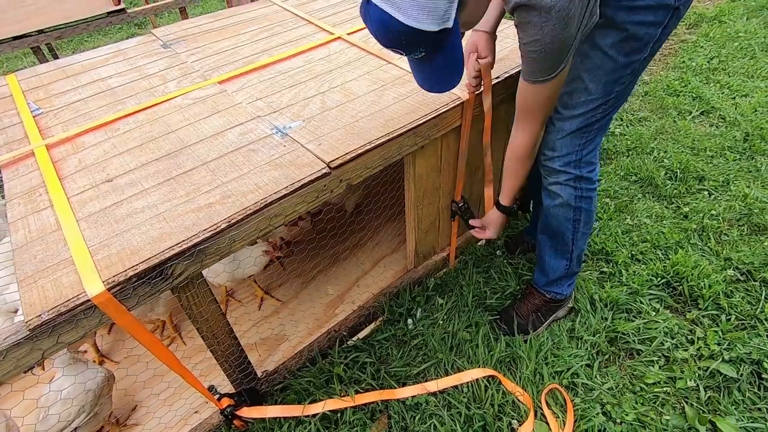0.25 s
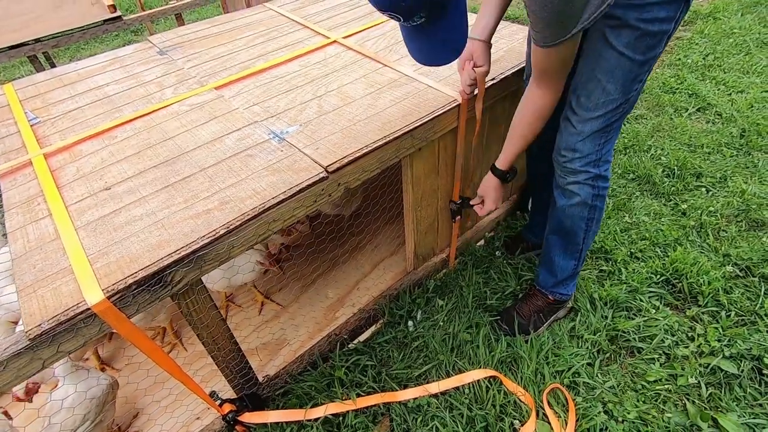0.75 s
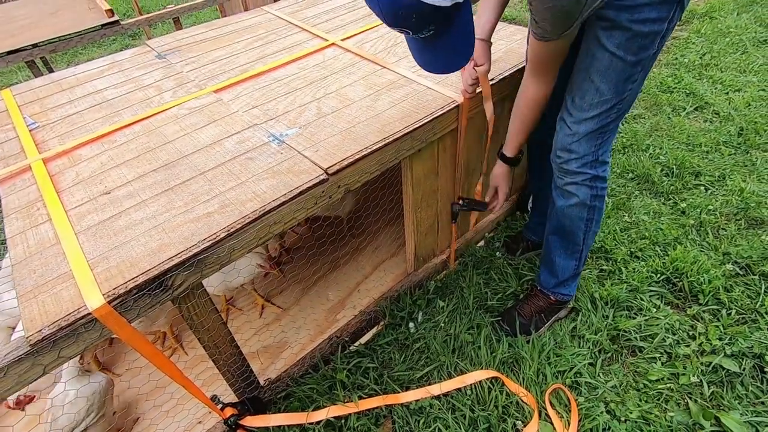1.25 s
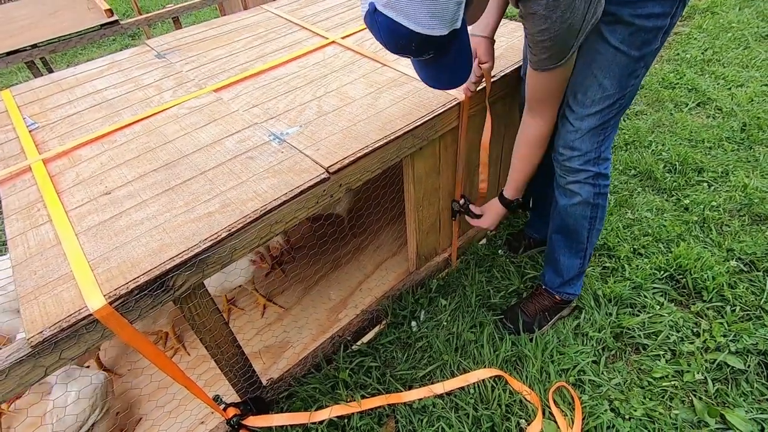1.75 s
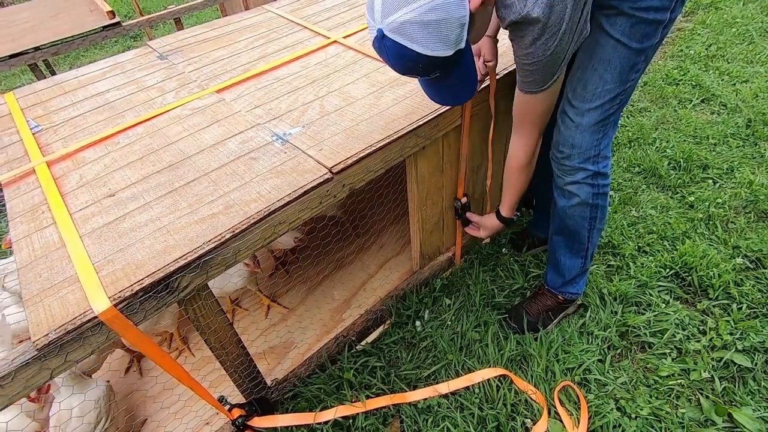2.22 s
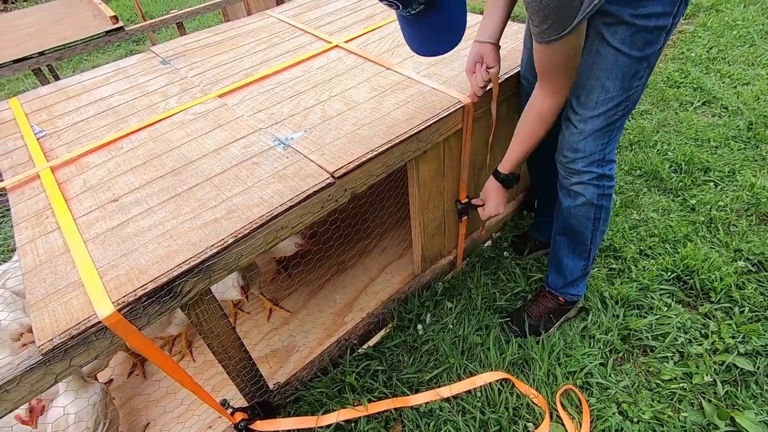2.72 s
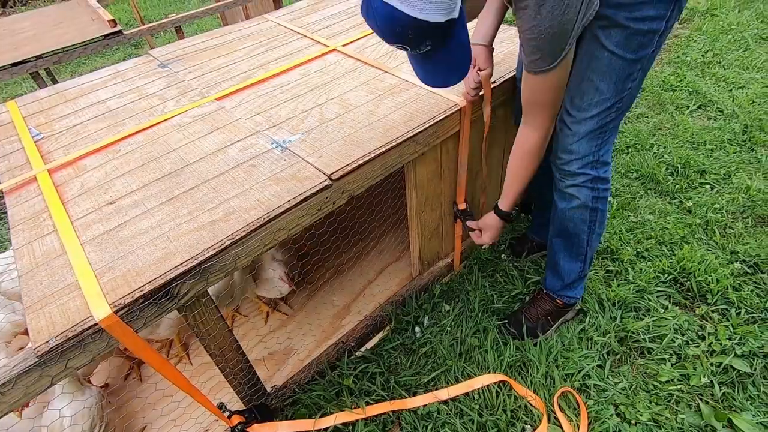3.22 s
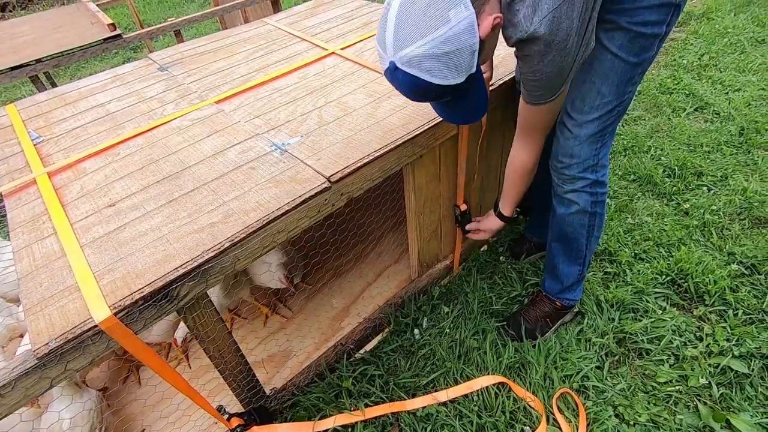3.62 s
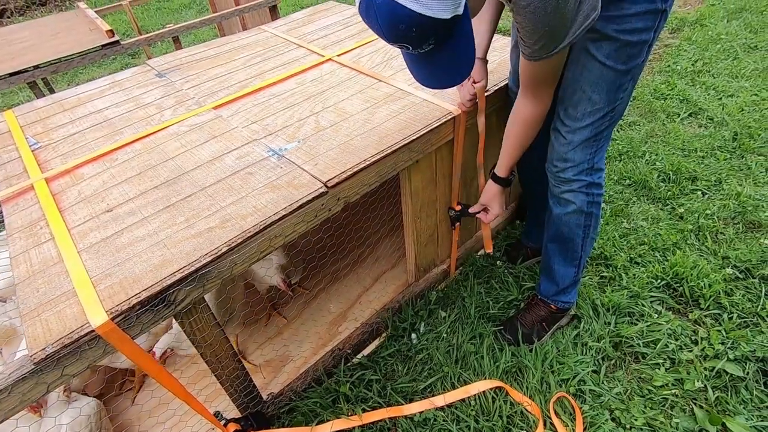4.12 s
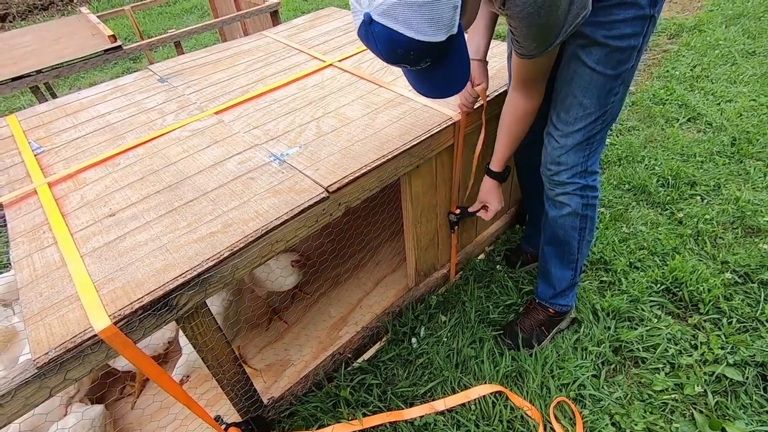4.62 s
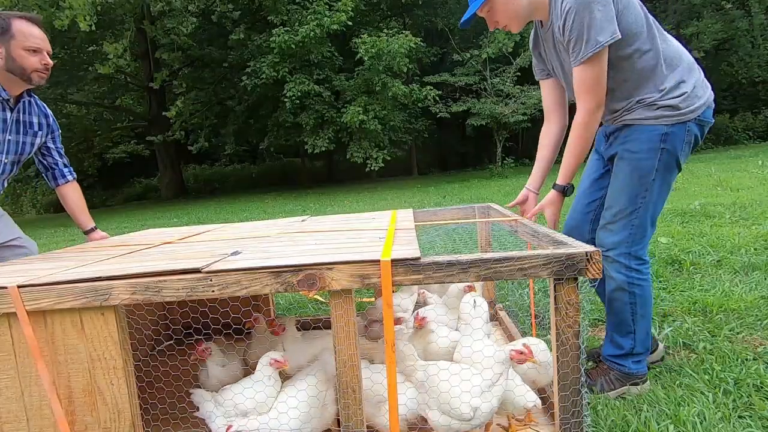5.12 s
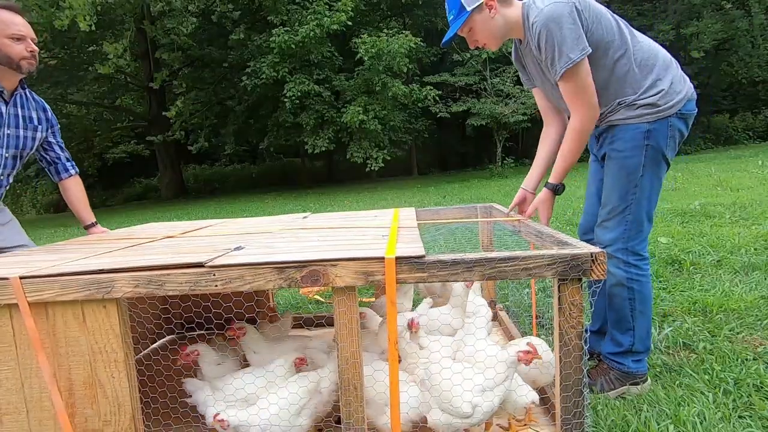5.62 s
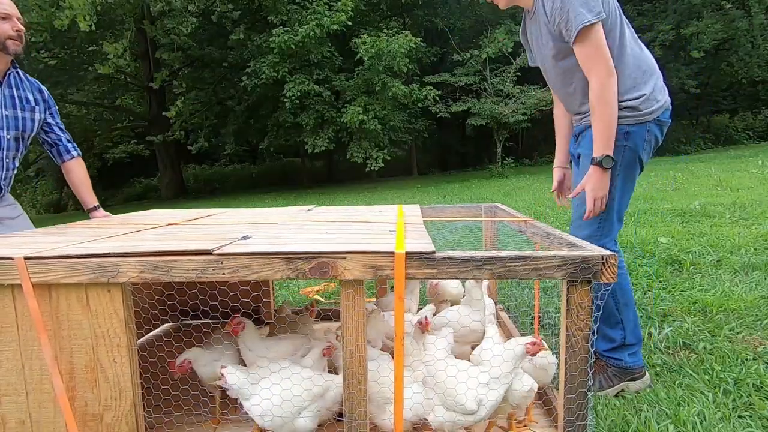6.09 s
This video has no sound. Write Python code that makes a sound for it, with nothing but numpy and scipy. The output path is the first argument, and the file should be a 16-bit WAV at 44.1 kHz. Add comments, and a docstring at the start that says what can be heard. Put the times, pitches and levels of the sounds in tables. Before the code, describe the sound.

A close outdoor take beside a wooden coop full of chickens, with feather rustle, shuffling feet and a barely audible low breeze. From 0 to 1.1 s a steel strap ratchet clicks and snaps in a quickening run, ending in a hard board knock and low frame thuds around 1 s. Chickens give falling chirps and small croaks from about 1.3 s as webbing swishes near 1.7 s. Snaps return at 1.8 to 2.2 s with heavy wooden thumps, then a very sharp clack at 2.7 s and more until 3.1 s. Lighter clicks follow from 3.3 to 3.7 s, and a last run with thuds at 3.9 to 4.2 s. Afterwards there is no cranking: thin cries and chirps, weak dull knocks from 4.8 s, then hoarse overlapping flock chatter around 5.5 to 5.9 s and again just after 6 s, with trailing cries.

```python
"""A light breeze sways the air, mostly below hearing, while birds shuffle and rustle in a wooden coop.
A ratchet strap is cranked tight on it: its handle clacks and its steel pawl snaps over the teeth.
Soon the boards knock and the frame thuds, and young chickens chirp in falling notes and cry.
Near the end the boards knock a few more times and the flock breaks into hoarse chatter.
Blows are bursts of noise shaped by steel or wood, thuds are ringing tones, and calls are gliding tones."""
import sys
import numpy as np
from scipy import signal
from scipy.fft import rfft, irfft, next_fast_len
from scipy.io import wavfile
from scipy.ndimage import map_coordinates

SR = 44100
rng = np.random.default_rng(int(sys.argv[2]) if len(sys.argv) > 2 else 0)


def dump_mix(stems):
    """Bounce the given channels to the path in sys.argv[1] as a 16-bit WAV at rate SR."""
    frames = np.atleast_2d(stems).T  # one column per channel
    limited = np.clip(frames, -1, 1)  # hard clip at full scale
    pcm = np.round(limited * 32767).astype(np.int16)
    wavfile.write(sys.argv[1], SR, pcm)


N = 280035  # samples in the scene

# slow sway of the air: time_s, level_db
BREEZE_LEVELS = [(4.4, -15.5), (5, -22), (6.35, -32)]

# colour of the birds' shuffling: frequency_hz, level_db (per Hz)
SHUFFLE_COLOUR = [(60,2), (342,-10), (600,-23.5), (4000,-29), (8800,-43)]
# colour of feathers and webbing: frequency_hz, level_db (per Hz)
RUSTLE_COLOUR = [(1200,5), (2800,-8), (6500,-6), (16000,-22)]
RUSTLE_DB = -58  # level of the steady feather rustle
# webbing slides through the buckle: time_s, level_db
STRAP_PULLS = [(1.67, -44), (2.96, -46.5), (4.1, -49.5)]
PULL_S = 0.052  # half the length of a pull

# the handle clacks against its stops: start_s, level_db, brightness_db (per octave)
HANDLE_CLACKS = [(0.051, -29, -2), (0.125, -28, -2), (0.671, -24.5, -1), (1.092, -30, -3.5), (1.18, -35, 5),
                 (2.147, -22, -4.5), (2.427, -37, -1), (2.454, -33, -1.5), (2.65, -25.5, -0.5),
                 (2.676, -9.5, 0.5), (2.866, -21.5, -6), (2.872, -17, -0.5), (2.997, -29.5, -2),
                 (3.098, -24, 0), (3.681, -31, -1), (4.076, -22, -3.5), (4.156, -16.5, -0.8)]
CLACK_S = 0.0019  # length of a clack
# the pawl snaps over a tooth: start_s, level_db, brightness_db (per octave)
PAWL_SNAPS = [(0.257, -19, -1.5), (0.364, -21, 1.5), (0.534, -21.5, -0.5), (0.744, -17.5, -0.5),
              (0.809, -16.5, 0), (0.907, -14.5, 0), (1.056, -17.5, -7), (1.068, -20.5, -2),
              (1.846, -21, -1), (1.98, -17.5, 0.3), (2.783, -13, 1.5), (2.912, -14, -0.6),
              (3.318, -18, 1.5), (3.416, -20, -1.2), (3.53, -21, -2), (3.585, -20.5, -2.8),
              (3.969, -15.5, -1.5), (4.139, -21, -1.5)]
SNAP_S = 0.0068  # length of a snap
SLIDE_S, SLIDE_DB = 0.012, -19.5  # the slide before a snap: average length, level relative to the snap
REBOUND_S, REBOUND_DB = 0.006, -5.5  # the pawl strikes again: average delay, greatest relative level
LOOSE_S, LOOSE_DB = 0.071, -19  # faint ticks after a contact: longest delay, greatest relative level
# colour of the ratchet's steel: frequency_hz, level_db (per Hz)
STEEL_COLOUR = [(300, -11), (1000, -8), (1900, -8.5), (3200, -1), (7400, 2), (10000, -2.5), (15500, -13.5)]
# resonances of the steel, before chance: pitch_hz, width_hz, level_db
STEEL_RESONANCES = [(4750, 250, -2), (7330, 350, -2.5), (12070, 250, -2)]
STEEL_SPREAD_DB, RAGGED_DB = 3.5, 4  # colour change between contacts, level flutter within one

# knocks on the boards: start_s, level_db (before a 6 dB lift), hardness_hz (cut-off)
BOARD_KNOCKS = [(0.507, -42.5, 825), (0.766, -39.5, 960), (.921, -35.5, 915), (1.054, -9.5, 1300),
                (1.062, -18, 1020), (1.899, -30, 1030), (1.965, -13, 620), (2.058, -24.5, 990),
                (2.07, -12, 476), (2.258, -22, 860), (2.652, -35, 950), (2.997, -34, 490),
                (3.217, -33, 1040), (3.3, -34.5, 545), (3.361, -36, 444), (3.613, -24.5, 640),
                (4.056, -39.5, 1400), (4.842, -39, 470), (5.064, -41.5, 700), (5.408, -27.5, 905),
                (5.458, -31, 640), (5.564, -29.5, 605), (6.102, -26, 1010)]
CONTACT_S = 0.0027  # contact time of a blow listed at 0 dB
CONTACT_DOUBLES_DB = 11.5  # contact time doubles for each such drop in level
# colour of the coop's boards: frequency_hz, level_db (per Hz)
BOARD_COLOUR = [(50, -4.5), (200, 4), (350, 1), (680, -4.5), (2000, -8.5), (12000, -4)]
# resonances of the roof panel: pitch_hz
PANEL_PITCHES = [345, 484, 678, 1112]
PANEL_WIDTH_HZ, PANEL_DB = 18, -11  # width and height of each panel resonance

# the whole frame takes the strap's pull: start_s, level_db
FRAME_THUDS = [(0.761, -21), (0.923, -22), (0.991, -11.5), (1.059, -18.5), (2.07, -16.5), (2.658, -17),
               (2.795, -18), (2.923, -20), (3.947, -18), (4.063, -16.5), (4.198, -15.5)]
# ringing tones of the frame, before chance: pitch_hz, level_db, t60_s (time to fade by 60 dB)
FRAME_TONES = [(107, 5.5, 0.23), (154.6, 1, 0.23), (208.9, -4, 0.35)]
# the boards rub as the frame flexes: length, cut-off, level relative to the thud
CREAK_S, CREAK_HZ, CREAK_DB = 0.013, 627, -11

# unbroken, gliding cries: start_s, end_s, opening_pitch_hz, closing_pitch_hz, level_db
GLIDING_CRIES = [(0.971, 1.061, 3150, 2410, -42.5), (1.176, 1.375, 2406, 2130, -58),
                 (1.415, 1.446, 967, 746, -39.5), (1.447, 1.472, 1425, 2600, -45),
                 (1.468, 1.528, 2470, 2140, -48), (2.126, 2.257, 2850, 2370, -42),
                 (2.47, 2.561, 3690, 2910, -50), (3.378, 3.526, 3440, 2750, -47.5),
                 (3.429, 3.547, 2650, 2370, -44.5), (4.095, 4.166, 869, 805, -35),
                 (4.285, 4.345, 3500, 2290, -55), (4.361, 4.428, 1352, 860, -42.5),
                 (4.478, 4.55, 4420, 4000, -54.5), (4.528, 4.65, 4380, 2380, -51.5),
                 (5.037, 5.212, 3710, 2980, -51), (5.695, 5.83, 1790, 1594, -43),
                 (5.942, 6.048, 4060, 3300, -59), (6.152, 6.353, 3680, 2370, -50.5),
                 (6.164, 6.349, 2350, 1670, -49)]
# nearest chickens' chirps: start_s, end_s, opening_pitch_hz, whistle_db, croak_db
CHIRPS = [(1.269, 1.39, 1300, -45.5, -36.5), (1.827, 1.941, 3050, -37, -42), (2.086, 2.261, 3200, -44, -36),
          (2.478, 2.562, 1660, -38, -40), (2.556, 2.74, 1220, -44, -34.5),
          (2.932, 3.063, 2400, -41.5, -48.5), (3.104, 3.216, 3350, -46.5, -37.5),
          (3.659, 3.806, 1647, -47.5, -33.5), (3.758, 3.841, 2100, -40.5, -36.5),
          (3.829, 3.913, 2400, -48, -41), (4.374, 4.486, 3800, -46, -42.5), (4.572, 4.673, 2600, -40, -43),
          (5.03, 5.141, 3300, -46.5, -41), (5.228, 5.297, 3600, -41.5, -43),
          (5.465, 5.554, 2985, -42.5, -41.5), (5.561, 5.679, 3300, -47.5, -36),
          (5.701, 5.783, 2700, -47, -33.5), (5.779, 5.895, 3400, -55, -40),
          (6.025, 6.127, 2750, -34.5, -33.5), (6.061, 6.184, 3450, -43, -36.5)]
SAG_PER_S, BREAK_S = 0.98, 0.032  # slow sinking rate of a whistle, time over which it breaks
CROAK_HZ, CROAK_S = 792, 0.046  # pitch it plunges to, length of the closing croak
# bursts of flock chatter: first_call_s, last_call_s, calls (count)
CHATTER_BURSTS = [(5.47, 5.75, 15), (6.02, 6.13, 7)]
# flock's calls: middle pitch, highest pitch over lowest, greatest share of pitch lost
FLOCK_HZ, FLOCK_RANGE, CHATTER_FALL = 2200, 3, 0.4
CHATTER_CALL_S, CHATTER_RASP, CHATTER_DB = 0.13, 0.5, -52  # average length, hoarseness, level
WHISTLE_RASP, CROAK_RASP = 0.26, 1  # hoarseness of a whistle, what the break adds
WAVER, RASP_RATE = 0.00706, 550  # share by which pitch wavers, hoarse flutters a second
# a voice: average distance and greatest level of side strands, overtone level, slow level flutter
STRAND_OCTAVES, STRAND_DB, OVERTONE_DB, FLUTTER_DB = 0.33, -10.5, -19, 3

TOP_HZ = 15900  # highest frequency the recorder keeps


def amp(db):
    """Turn decibels into a gain."""
    return 10 ** (np.asarray(db) / 20)


def unit(x):
    """Scale a sound to an average (rms) size of 1."""
    return x / np.sqrt(np.mean(x ** 2) + 1e-20)


def along(points, hz):
    """Read a (frequency, value) curve on a log frequency axis."""
    f, v = np.transpose(points)
    return np.interp(np.log(hz + 1), np.log(f + 1), v)


def curves(rows):
    """Draw one value per sample for each column after the time."""
    s, *cols = np.transpose(rows)
    return [np.interp(np.arange(N) / SR, s, c) for c in cols]


def wobble(rate, n):
    """Draw a smooth random curve of n samples through `rate` random points a second."""
    points = rng.standard_normal(int(n * rate / SR) + 4)
    return map_coordinates(points, [np.arange(n) * rate / SR])


def filtered(x, gain):
    """Filter x by gain(hz), with no sound ahead of its cause (a minimum-phase filter)."""
    m = 2 * next_fast_len(len(x))
    cepstrum = irfft(np.log(np.maximum(gain(np.fft.rfftfreq(m, 1 / SR)), 1e-6)), m)
    # folding the second half onto the first keeps the response after time zero
    cepstrum[1:m // 2] *= 2
    cepstrum[m // 2 + 1:] = 0
    return irfft(rfft(x, m) * np.exp(rfft(cepstrum)), m)[:len(x)]


def noise(spectrum):
    """Make coloured noise of rms 1."""
    return unit(filtered(rng.standard_normal(N), lambda hz: amp(along(spectrum, hz))))


def add(track, s, sound):
    """Mix a sound into the track at time s."""
    part = track[max(round(s * SR), 0):][:len(sound)]
    part += sound[:len(part)]


def at_level(x, db, length):
    """Give a blow the energy of a level db held for its length."""
    return x * amp(db) * np.sqrt(length * SR / np.sum(x ** 2))


def contact(t, length, grit, ring_db, t60):
    """A gritty scrape builds up and lets go; longer ones leave more chatter in loose parts."""
    grains = wobble(2500, len(t))
    build_up = 1 - np.exp(-t / (0.22 * length))
    let_go = np.exp(-(t / length) ** 3)
    scrape = build_up * let_go * unit(np.exp(grit * grains))
    chatter = np.sqrt(length / t60) * amp(ring_db - 60 * t / t60)
    return (scrape + chatter) * rng.standard_normal(len(t))


def coop(x, wet_db, t60):
    """Dense echoes between the plywood walls: a dulled noise tail that fades by 60 dB in t60 seconds."""
    t = np.arange(SR // 3) / SR
    tail = rng.standard_normal(len(t)) * amp(-60 * t / t60)
    tail = filtered(tail / np.linalg.norm(tail), lambda hz: 1 / np.hypot(1, hz / 5000))
    return x + amp(wet_db) * signal.fftconvolve(x, tail)[:N]


def breeze():
    """Slow swings of air pressure, with a faint rumble above them, made from very low noise."""
    sway_db, = curves(BREEZE_LEVELS)
    return amp(sway_db) * noise([(5, -3.5), (38, -30), (52, -40.0), (1000, -115)])


def stirring():
    """Birds shuffle and tap on the floor; feathers rustle, and the webbing swishes at each pull."""
    clock = np.arange(N) / SR
    pulls = sum(amp(db) * np.exp(-((clock - s) / PULL_S) ** 2) for s, db in STRAP_PULLS)
    rubbing = amp(RUSTLE_DB) + pulls
    shuffle = amp(-41.5) * unit(noise(SHUFFLE_COLOUR) * amp(5.5 * wobble(35, N)))
    flutter_db = 2 * wobble(50, N) + 3.5 * wobble(900, N)
    rustle = rubbing * unit(noise(RUSTLE_COLOUR) * amp(flutter_db))
    # 70 short taps at random times, dulled by the boards
    steps, t = np.zeros(N), np.arange(SR // 8) / SR
    for when, size in rng.random(size=(70, 2)):
        tap = amp(10 * size - 60 * t / 0.047) * rng.standard_normal(len(t))
        add(steps, when * N / SR, tap)
    steps = filtered(steps, lambda hz: amp(along(BOARD_COLOUR, hz)) / (1 + (hz / 700) ** 2))
    return shuffle + rustle + amp(-49) * unit(steps)


def steel(t, length, bright_db):
    """One ragged steel contact, its colour and resonances varied by chance."""
    sizes = STEEL_SPREAD_DB * rng.standard_normal(len(STEEL_RESONANCES))
    bumps = STEEL_SPREAD_DB * rng.standard_normal(20)
    bump_hz = np.linspace(0, SR / 2, len(bumps))

    def ring(hz):
        """Add a peak at each resonance of the steel."""
        return 1 + sum(amp(level + a) / (1 + (2 * (hz - f) / width) ** 2)
                       for a, (f, width, level) in zip(sizes, STEEL_RESONANCES))

    def gain(hz):
        """Join the steel's colour, its chance bumps, the brightness above 2500 Hz and the ringing."""
        tilt_db = bright_db * np.log2(np.maximum(hz / 2500, 1))
        colour_db = np.interp(hz, bump_hz, bumps) + tilt_db
        return amp(along(STEEL_COLOUR, hz) + colour_db) * ring(hz)

    push = contact(t, length, grit=0.87, ring_db=7, t60=0.051)
    return filtered(push * amp(RAGGED_DB * wobble(538, len(t))), gain)


def ratchet():
    """The pawl slides up a tooth, slaps home and rebounds; the handle clacks and loose parts tick."""
    out, t = np.zeros(N), np.arange(SR // 8) / SR
    chances = rng.random((len(PAWL_SNAPS), 3))
    for (s, db, bright_db), (slow, late, hard) in zip(PAWL_SNAPS, chances):
        slide_s = SLIDE_S * (0.5 + slow)
        slide = steel(t, slide_s, bright_db)
        add(out, s - slide_s, at_level(slide, db + SLIDE_DB, SNAP_S))
        snap = steel(t, SNAP_S, bright_db)
        add(out, s, at_level(snap, db, SNAP_S))
        rebound = steel(t, CLACK_S, bright_db)
        rebound_db = db + REBOUND_DB - 10 * hard
        add(out, s + REBOUND_S * (0.5 + late), at_level(rebound, rebound_db, CLACK_S))
    for s, db, bright_db in HANDLE_CLACKS:
        add(out, s, at_level(steel(t, CLACK_S, bright_db), db, CLACK_S))
    # two loose ticks follow every contact
    contacts = [*PAWL_SNAPS, *HANDLE_CLACKS] * 2
    for (s, db, bright_db), (lag, size) in zip(contacts, rng.random((len(contacts), 2))):
        tick = steel(t, CLACK_S / 2, bright_db)
        add(out, s + LOOSE_S * lag, at_level(tick, db + LOOSE_DB - 20 * size, CLACK_S))
    return out


def boards(push, hard_hz):
    """The coop answers a push: harder contacts reach higher, and the roof panel rings along."""
    def gain(hz):
        """Join the wood's colour, the panel's peaks and the low and high cuts set by hardness."""
        peaks = sum(1 / (1 + (2 * (hz - f) / PANEL_WIDTH_HZ) ** 2) for f in PANEL_PITCHES)
        panel = 1 + amp(PANEL_DB) * peaks
        low_cut = hz ** 2 / (hz ** 2 + (0.21 * hard_hz) ** 2)
        high_cut = 1 / np.sqrt(1 + (hz / hard_hz) ** 4.8)
        return amp(along(BOARD_COLOUR, hz)) * panel * low_cut * high_cut

    return filtered(push, gain)


def knocks():
    """A blow, then a rattle of damped boards: strong blows are brief, weak ones scuff."""
    out, t = np.zeros(N), np.arange(SR // 4) / SR
    for s, db, hard_hz in BOARD_KNOCKS:
        length = CONTACT_S * 2 ** (-db / CONTACT_DOUBLES_DB)
        push = contact(t, length, grit=0.9, ring_db=6.5, t60=0.094)
        push[0] += 0.0055 / length * np.linalg.norm(push)  # short contacts land as one clean impact
        add(out, s, at_level(boards(push, hard_hz), db + 6.0, length))
    return out


def thuds():
    """Each heave sets the low tones of the frame ringing and rubs its boards together."""
    out, t = np.zeros(N), np.arange(SR // 3) / SR
    for s, db in FRAME_THUDS:
        chance = rng.standard_normal((len(FRAME_TONES), 2))
        ring = np.zeros(len(t))
        for (hz, level, t60), (a, b) in zip(FRAME_TONES, chance):
            # chance shifts each tone's level, direction and pitch
            fade = np.sign(a) * amp(level + 2 * a - 60 * t / t60)
            ring += fade * np.sin(2 * np.pi * hz * (1 + 0.034 * b) * t)
        soft_start = 1 - np.exp(-t / 0.0011)
        add(out, s, at_level(ring * soft_start, db, 0.0087))
        rub = contact(t, CREAK_S, grit=1.0, ring_db=28.0, t60=0.09)
        add(out, s, at_level(boards(rub, CREAK_HZ), db + CREAK_DB, CREAK_S / 2))
    return out


def voice(hz, rasp):
    """A wavering, hoarse tone with an overtone; weaker strands glide a drifting interval below and above."""
    n = len(hz)

    def tone(f):
        """Spin a tone whose pitch follows f and wavers."""
        wavering_hz = f * (1 + WAVER * wobble(69, n))
        return np.exp(2j * np.pi * np.cumsum(wavering_hz) / SR)

    def rough():
        """Draw fast hoarseness on top of a slower flutter of level."""
        hoarse = 1 + rasp * (wobble(RASP_RATE, n) + 1j * wobble(RASP_RATE, n))
        return hoarse * amp(FLUTTER_DB * wobble(65.9, n))

    main = tone(hz)
    sound = rough() * (main + amp(OVERTONE_DB) * main ** 2)  # squaring doubles the pitch
    for side, size in ((-1, 1), (1, 0.54)):
        # the interval drifts between two chance values
        octaves = side * STRAND_OCTAVES * np.linspace(*(0.5 + rng.random(2)), n)
        strand_gain = size * min(hz[0] / FLOCK_HZ, 1) * amp(STRAND_DB)  # weaker in low voices
        sound = sound + strand_gain * rough() * tone(hz * 2 ** octaves)
    return unit(np.real(sound))


def cry(length, first_hz, last_hz, db, rasp):
    """A call that swells quickly, glides and stops without breaking."""
    u = np.linspace(0, 1, int(max(length, 0.02) * SR))
    swell = np.sqrt(np.abs(np.sin(np.pi * np.sqrt(u))))
    return amp(db) * swell * voice(first_hz * (last_hz / first_hz) ** u, rasp)


def chirp(length, first_hz, whistle_db, croak_db):
    """A sinking whistle that fades as it breaks into a hoarse, plunging croak."""
    t = np.arange(max(int(length * SR), SR // 20)) / SR
    left = len(t) / SR - t  # seconds still to go
    held = 1 - np.exp(-left / BREAK_S)  # near 1 in the whistle, 0 once fully broken
    hz = CROAK_HZ * (first_hz * np.exp(-SAG_PER_S * t) / CROAK_HZ) ** held
    attack = 1 - np.exp(-t / 0.016)
    whistle = amp(whistle_db) * attack * np.sqrt(left / left[0]) * held
    croak = amp(croak_db) * np.sin(np.pi * np.sqrt(np.minimum(left / CROAK_S, 1))) ** 2
    return voice(hz, WHISTLE_RASP + CROAK_RASP * (1 - held)) * (whistle + croak)


def chickens():
    """The nearest birds chirp and cry, and bursts of hoarse, overlapping chatter run through the flock."""
    out = np.zeros(N)
    for start, end, first_hz, whistle_db, croak_db in CHIRPS:
        add(out, start, chirp(end - start, first_hz, whistle_db, croak_db))
    for start, end, first_hz, last_hz, db in GLIDING_CRIES:
        add(out, start, cry(end - start, first_hz, last_hz, db, WHISTLE_RASP))
    for first, last, count in CHATTER_BURSTS:
        starts = np.linspace(first, last, count)
        for start, (size, span, fall) in zip(starts, rng.random((count, 3))):
            hz = FLOCK_HZ * FLOCK_RANGE ** (size - 0.5)
            last_hz = hz * (1 - CHATTER_FALL * fall)
            length = CHATTER_CALL_S * (0.5 + span)
            add(out, start, cry(length, hz, last_hz, CHATTER_DB, CHATTER_RASP))
    return coop(out, wet_db=-8, t60=0.13)


def scene():
    """Calls and knocks echo in the coop, the outside ratchet fainter and longer; the rest stays dry."""
    outside = coop(ratchet(), wet_db=-23.5, t60=0.6)
    wood = coop(knocks(), wet_db=-11.5, t60=0.14) + thuds()
    return (outside + wood + chickens() + stirring() + breeze())[None]


def record(dry):
    """The recorder rounds off the highest peaks and keeps almost nothing above its band limit."""
    held = dry / (1 + np.abs(dry) ** 8) ** (1 / 8)
    band_limit = 1 + (np.fft.rfftfreq(N, 1 / SR) / TOP_HZ) ** 120
    return irfft(rfft(held) / band_limit, N)


dry = scene()
out = record(dry)
dump_mix(out)
```